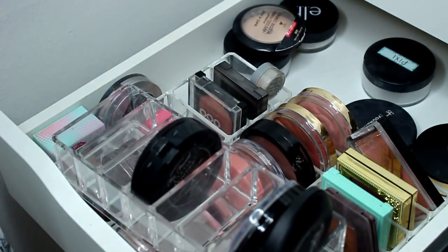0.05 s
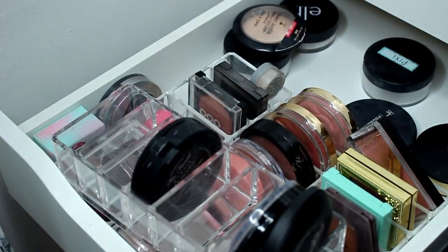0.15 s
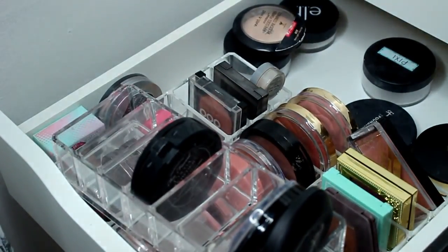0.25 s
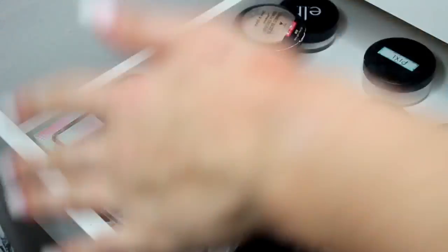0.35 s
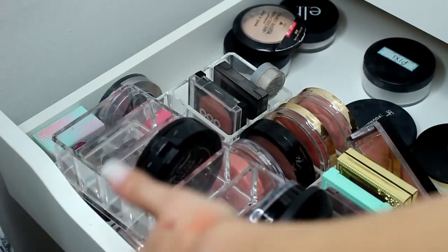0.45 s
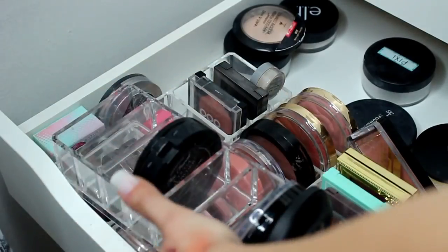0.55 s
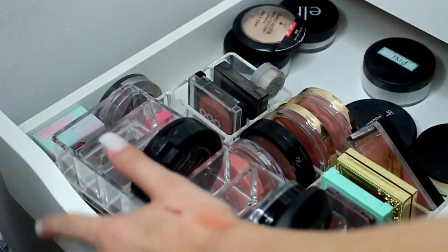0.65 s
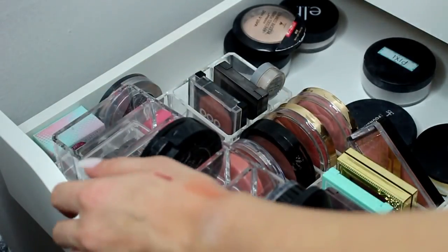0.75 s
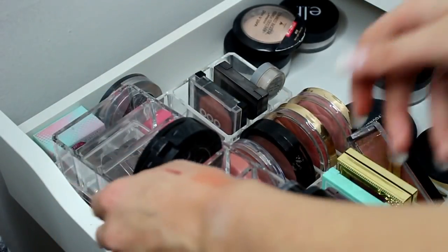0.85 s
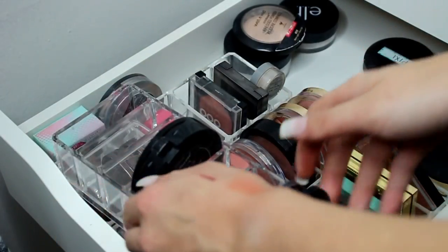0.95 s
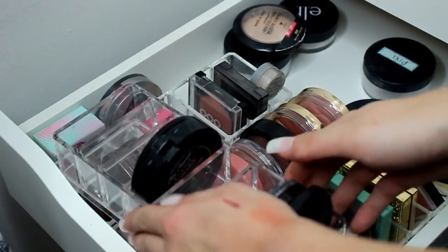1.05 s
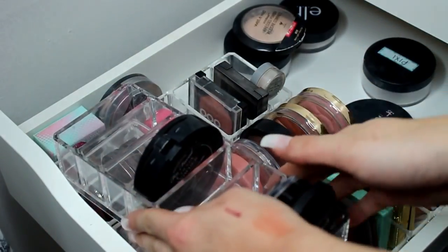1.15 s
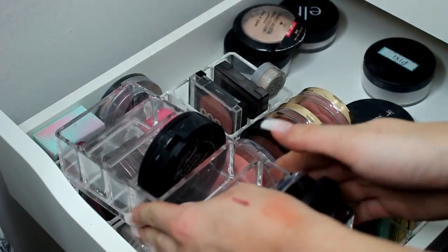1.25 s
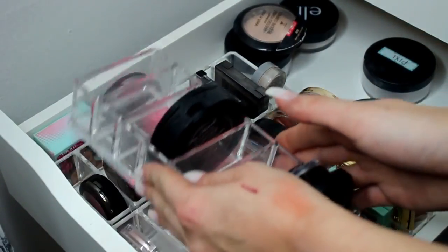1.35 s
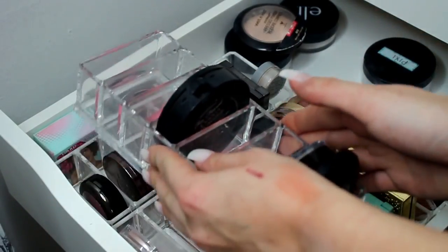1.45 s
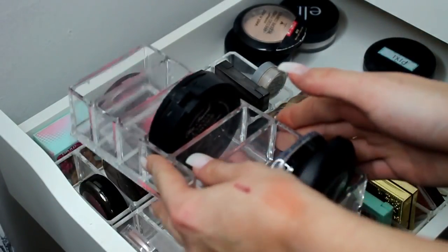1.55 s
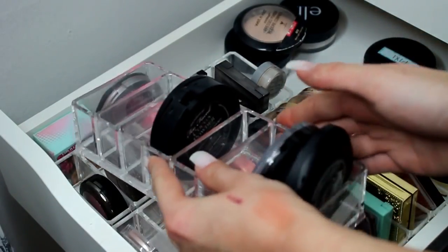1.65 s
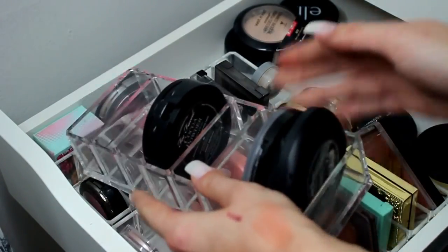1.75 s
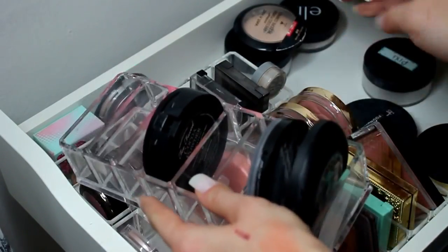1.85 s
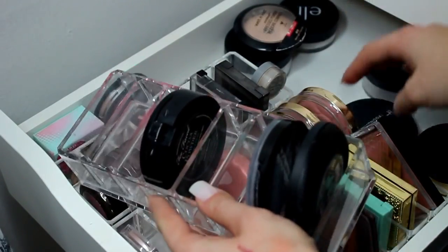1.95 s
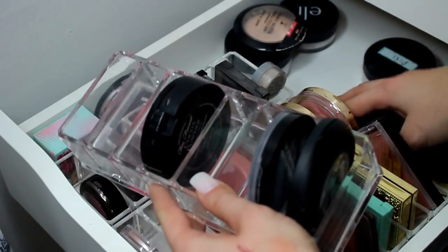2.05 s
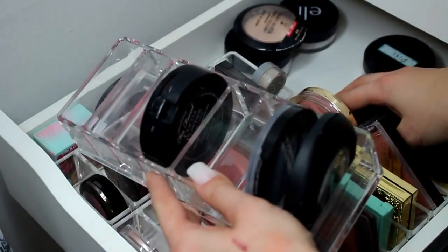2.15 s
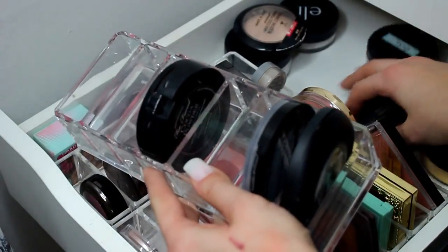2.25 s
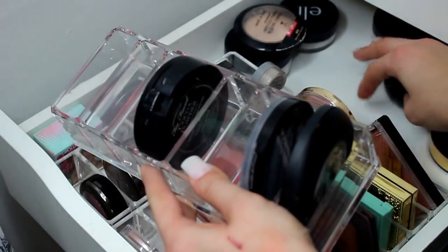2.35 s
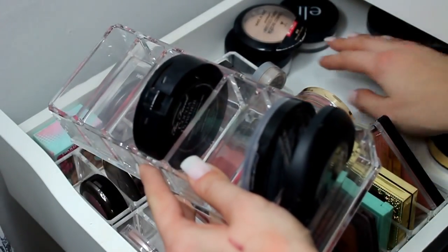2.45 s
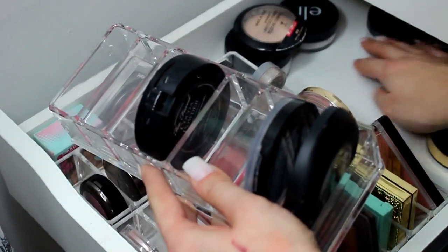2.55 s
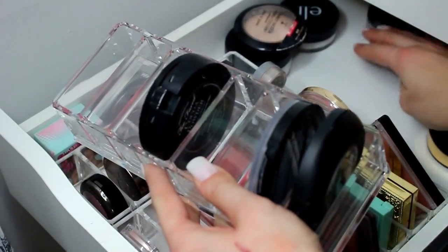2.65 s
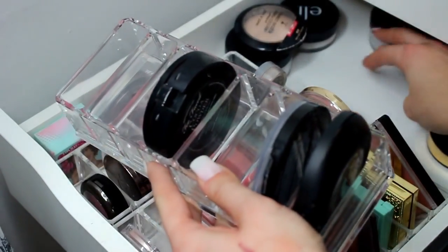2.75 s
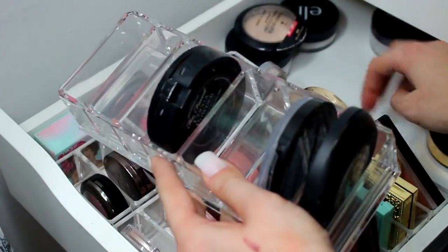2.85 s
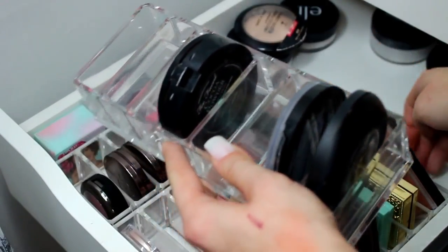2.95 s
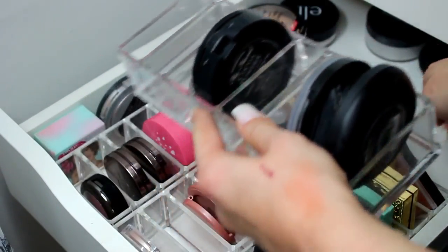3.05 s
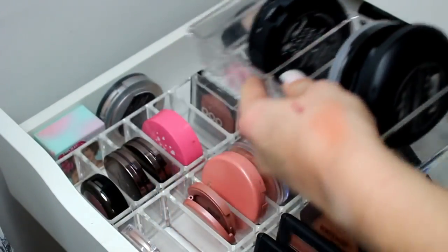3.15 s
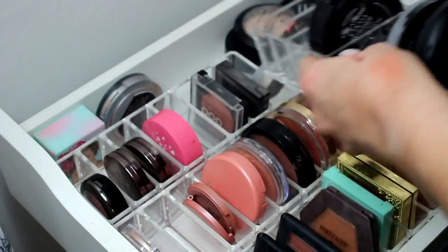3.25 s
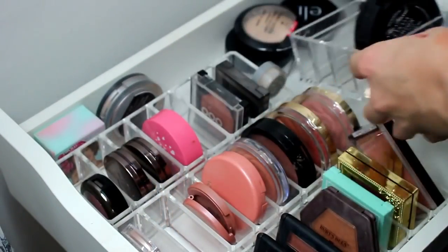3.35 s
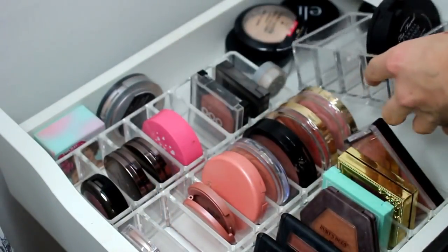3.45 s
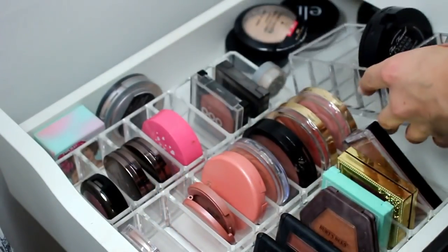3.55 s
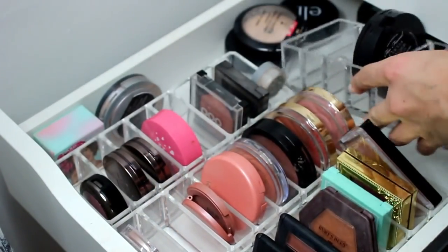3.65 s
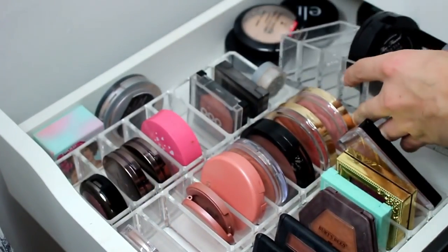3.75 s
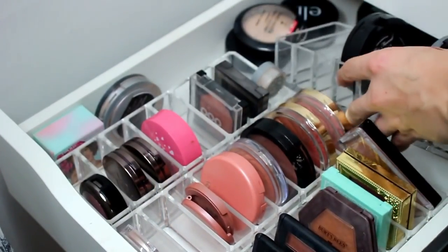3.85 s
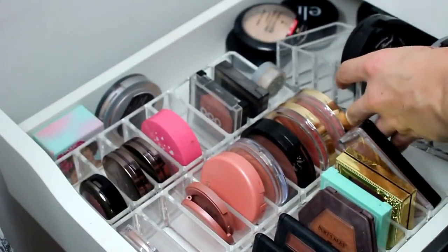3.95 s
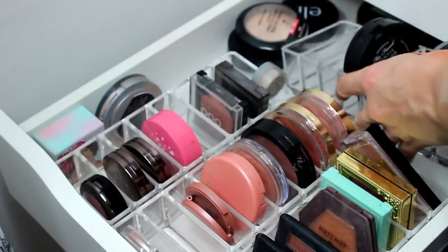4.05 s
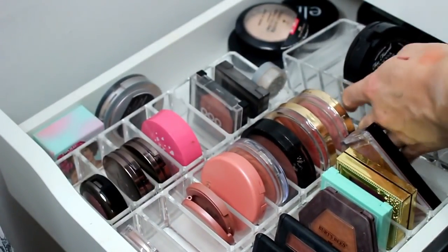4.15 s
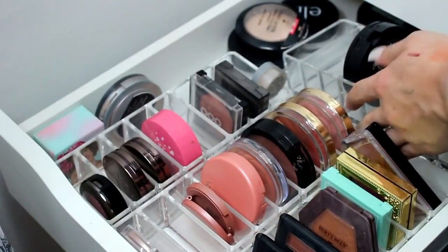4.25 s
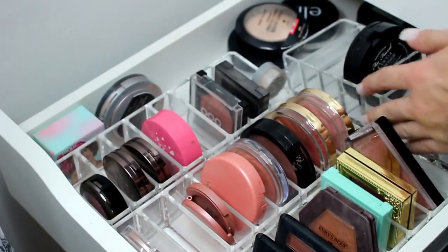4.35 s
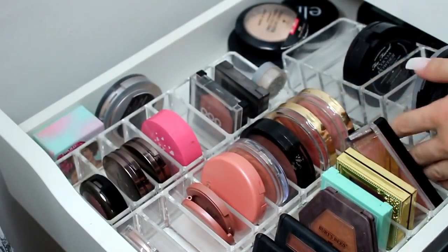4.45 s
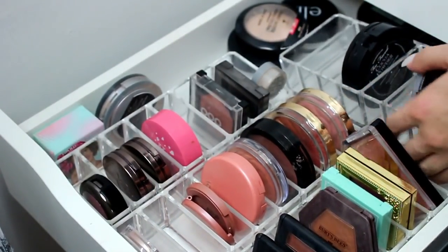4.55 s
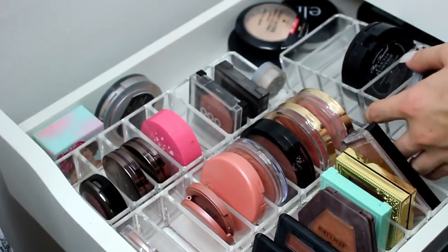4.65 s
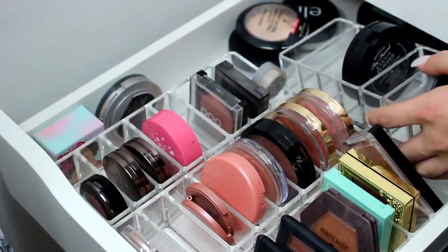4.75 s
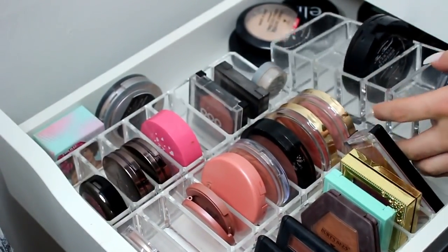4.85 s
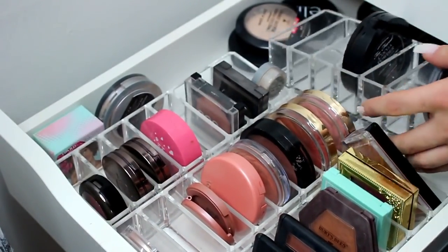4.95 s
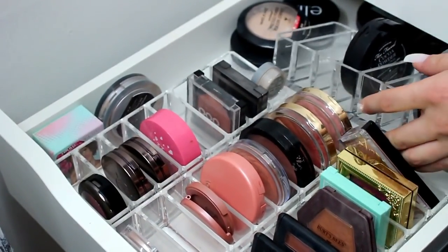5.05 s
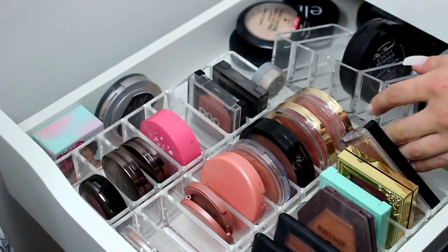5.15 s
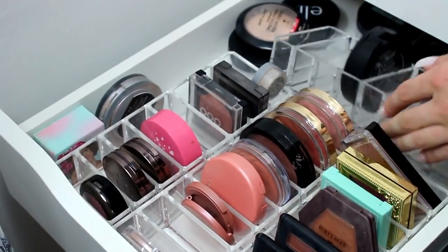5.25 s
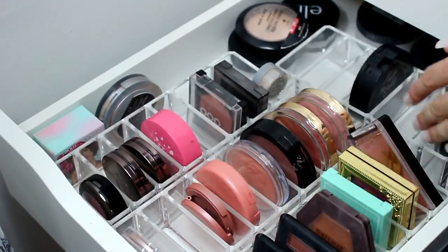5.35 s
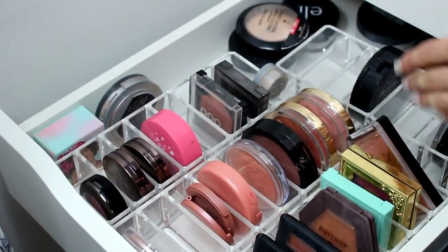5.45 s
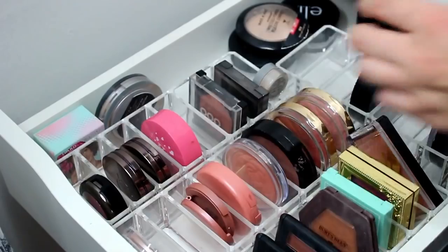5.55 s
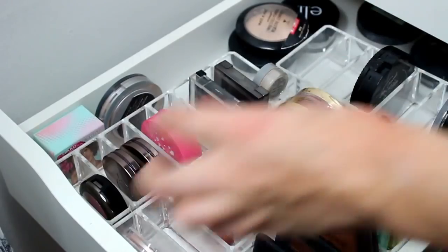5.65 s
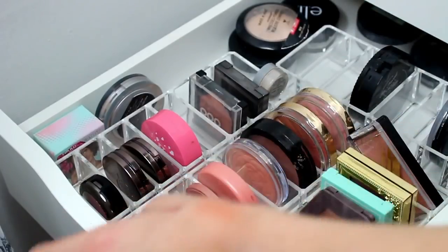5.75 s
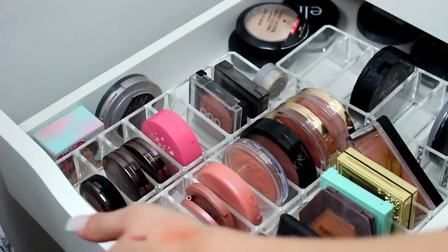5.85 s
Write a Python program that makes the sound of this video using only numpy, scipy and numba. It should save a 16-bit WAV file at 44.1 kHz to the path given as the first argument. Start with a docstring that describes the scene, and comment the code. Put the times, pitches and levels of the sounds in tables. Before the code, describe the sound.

Hands handle hard plastic cases in a drawer. A quiet opening with light ticks gives way to short, bright clacks, hollow drawer knocks and brief gritty drags. The loudest hits come near the middle and slightly distort. Dense rattling continues as the tray is nudged into place, fading to a faint slide at the end. Very close, dry indoor sound with little echo.

```python
"""Plastic tray and pots in a wooden drawer

Hands lift a clear plastic tray of compacts, shove loose pots along a wooden drawer and set the tray down in it.
Cases knock in short rattling contacts: bursts of noise that ring decaying sines of tray and drawer.
Pots drag with stick-slip (jolting noise through the same rings), skin brushes plastic (filtered noise),
a case squeaks (a rough tone) and the cabinet thumps (low sines).
A small quiet room with faint air, and a close microphone that clips the hardest knocks."""
import sys
import numpy as np
from scipy import signal
from scipy.fft import rfft, irfft
from scipy.io import wavfile
from scipy.ndimage import uniform_filter1d
from numba import njit

SR = 44100
rng = np.random.default_rng(int(sys.argv[2]) if len(sys.argv) > 2 else 0)


def wrap_up_sound(samples):
    """Save the sound to the file named by the first command line argument, as 16-bit audio."""
    columns = np.atleast_2d(samples).T
    # keep every value between -1 and 1, then stretch to whole-number steps
    tamed = np.clip(columns, -1, 1)
    steps = np.round(tamed * 32767).astype(np.int16)
    wavfile.write(sys.argv[1], SR, steps)


def volts(x):
    """Linear amplitude factor 10**(x/20) for a level x in dB, scalar or array-like."""
    e = np.asarray(x, float) / 20
    return 10 ** e


N = 259924  # length in samples

# Ways the tray and cases ring. Each row: pitch in Hz before detuning, level in dB, time to fall 60 dB in seconds.
TRAY_MODES = [(770, -3, 0.013), (887, -1.5, 0.015), (1050, -2, 0.013), (1331, -2.5, 0.014),
              (1658, -3.5, 0.011), (1998, -2, 0.011), (2834, -2.5, 0.0045)]
# Ways the drawer panels ring. Each row: pitch in Hz before detuning, level in dB, time to fall 60 dB in seconds.
DRAWER_MODES = [(238, 4, 0.04), (396, 2, 0.002), (409, 10, 0.024), (493, 26, 0.012)]
# Tone colour of the treble crackle. Each row: frequency in Hz, relative level in dB.
CRACK_COLOUR = [(700, -9), (1600, -11.5), (3400, 0.5), (5500, 2.5), (10400, -12), (16000, -25)]
RING_S = .08  # length of every computed ring, seconds


def unit(x):
    """Scale to an rms (average strength) of 1."""
    return x / np.sqrt(np.mean(x ** 2))


def peak(x):
    """Scale each row to a peak of 1."""
    return x / np.abs(x).max(axis=-1, keepdims=True)


def colour(x, points):
    """Filter by a spectrum given as (Hz, dB) points."""
    hz, db = np.transpose(points)
    f = np.fft.rfftfreq(x.shape[-1], 1 / SR) + 1  # the 1 avoids log(0)
    gain = volts(np.interp(np.log(f), np.log(hz), db))
    return irfft(rfft(x) * gain, x.shape[-1])


def rings(modes, detune):
    """One decaying sine per mode, neighbours in opposite sense, with every pitch multiplied by detune."""
    hz, db, t60 = np.array(modes).T[:, :, None]
    t = np.arange(int(RING_S * SR)) / SR
    sense = (-1) ** np.arange(len(modes))[:, None]
    decay = np.exp(-np.log(1000) * t / t60)
    return sense * volts(db) * decay * np.sin(2 * np.pi * hz * detune * t)


def walk(rate):
    """Random levels held for 1 / rate seconds, then smoothed over that time; rms near 1."""
    k = int(SR / rate)
    held = np.repeat(rng.standard_normal(N // k + 1), k)
    return unit(uniform_filter1d(held, k)[:N])


def grit(shape, spread_db):
    """Noise of very unequal grains, like tiny collisions."""
    grain_size = np.minimum(rng.exponential(size=shape), 6.0)
    return rng.standard_normal(shape) * volts(spread_db * grain_size)


@njit
def svf(x, hz, sharp):
    """Band-pass filter with a moving centre: it keeps what lies near hz, more narrowly if sharp is high."""
    y, band, low, damping = np.empty(len(x)), 0., 0., 1 / sharp
    for i in range(len(x)):
        g = np.tan(np.pi * hz[i] / SR)
        v = (band + g * (x[i] - low)) / (1 + g * (g + damping))
        band, low, y[i] = 2 * v - band, low + 2 * g * v, damping * v
    return y


def strokes(table, rise_db_s, fall_db_s):
    """Gain of each row over time: it swells to its level, holds for its length and dies away."""
    start, length, db = np.array(table).T[:3, :, None]
    t = np.arange(N) / SR
    before, after = np.maximum(start - t, 0), np.maximum(t - start - length, 0)
    return volts(db - rise_db_s * before - fall_db_s * after)


def loudest(table, gains):
    """Gain and last column of whichever row is strongest at each sample."""
    return gains.max(axis=0), np.array(table)[gains.argmax(axis=0), -1]


def room_air():
    """Faint room noise: random noise coloured mostly low, sinking in level early on."""
    # Each row: frequency in Hz, relative level in dB.
    air_colour = [(25, -14.5), (242, -8), (317, -19), (354, -5.5), (416, -15), (1950, -23), (16000, -38)]
    # Each row: time in seconds, rms level in dB.
    air_level = [(.9, -43.5), (1.6, -52)]
    s, db = np.transpose(air_level)
    level = np.interp(np.arange(N) / SR, s, db)
    return volts(level) * unit(colour(rng.standard_normal(N), air_colour))


def brush():
    """Skin on plastic: the broad hiss of a finger sliding over a smooth wall."""
    # Each row: start in seconds, length in seconds, level in dB, centre of the hiss in Hz.
    brushes = [(0.0, 0.12, -43, 5300), (.175, 0.05, -30, 5500), (.985, 0.018, -20, 7570),
               (2.24, 0.15, -45.5, 9050)]
    gain, hz = loudest(brushes, strokes(brushes, rise_db_s=709, fall_db_s=486))
    flutter = volts(2 * walk(200))
    hiss = svf(svf(grit(N, spread_db=1), hz, 1.2), hz, 1.2)
    return gain * flutter * unit(hiss)


def contacts():
    """All kinds of knock as rows of time, level, ring, thud, crack and whether a nail strikes."""
    # Cases clack against the tray. Each row: start in seconds, ring peak in dB, strongest ring in Hz,
    # treble crack in dB against the ring.
    clacks = [(1.021, -11, 1040, -14), (1.059, -8, 800, 2), (1.342, -6.5, 1050, -8),
              (1.35, -11.5, 800, 5.5), (1.379, -6.5, 2400, 6), (1.424, -6, 1250, -5.5),
              (1.483, -3.5, 1840, -7), (1.55, -7.5, 1090, -4), (1.572, -12.5, 1050, -6),
              (1.642, 5, 1090, -2.5), (1.775, -3, 764, 0.5), (1.783, -6, 1050, -10), (2.253, -4, 798, 5),
              (3.38, 5, 1500, -10.5), (3.427, -6.5, 806, -2.5), (3.488, -1, 970, 0.5),
              (3.675, -9, 830, -12), (3.688, -4.5, 770, -3.5), (3.725, 4, 820, 1), (3.762, -13, 2640, 4),
              (3.863, -6.5, 900, 1.5), (4.095, -8, 760, -7), (4.358, -8, 1260, 0.5), (4.519, -8, 710, -10),
              (4.543, -3, 1050, 2.5), (4.578, -7.5, 1270, 1.5), (4.613, -5.5, 1300, 2.5),
              (4.759, -8, 930, -23), (4.801, -6, 1070, -3.5), (4.888, -0.5, 1700, 4.5),
              (5.015, -2.5, 824, -2), (5.026, -4, 885, 5.5), (5.039, -4, 1290, -4.5), (5.181, -3, 1220, -5),
              (5.308, -1, 1000, -2), (5.372, -1.5, 576, 5.5), (5.529, -16, 1400, -3),
              (5.663, -25.5, 824, -7.5), (5.775, -32, 910, -5)]
    # Pots and tray bump the drawer. Each row: start in seconds, ring peak in dB,
    # drawer thud in dB against the ring, treble crack in dB against the ring.
    bumps = [(1.763, -12.5, -1, -2), (2.073, -17, 6, 5), (2.33, -8.5, 10.5, 2), (2.397, -5, -0.5, -4),
             (2.595, 1, -10, -5), (2.714, -6.5, -9, -19), (2.789, -9, 9.5, 3), (2.819, -22, 9.5, -26),
             (3.033, -4.5, 5.5, -1), (3.079, -22, 13, 9), (3.161, -3.5, 0, -1.5), (3.843, -7.5, 9, -27),
             (4.012, -13.5, 6, -31), (4.032, -14, 7.5, -30), (4.058, -10, -4.5, -30), (4.134, -2, 0, -11),
             (4.232, -14.5, -7, -36), (4.965, -13, -7, -17), (5.05, -12.5, 4.5, 5),
             (5.296, -3.5, -0.5, 8.5), (5.334, -6.5, 1.5, 5), (5.431, -15, -0.5, 4.5)]
    # Rims tick lightly. Each row: start in seconds, ring peak in dB.
    ticks = [(0.144, -22.5), (0.904, -36), (1.036, -19.5), (1.103, -28.5), (1.131, -31), (1.202, -38),
             (1.259, -21), (1.275, -35), (2.954, -21.5), (3.516, -22.5), (3.566, -27.5), (4.167, -25.5),
             (4.454, -32.5), (4.478, -31.5), (4.525, -24.5), (4.631, -21.5), (4.732, -25), (4.838, -21.5),
             (4.98, -18.5), (5.191, -13), (5.233, -17), (5.569, -26)]
    # Fingernails tick on hard plastic, nearly all treble. Each row: start in seconds, crack peak in dB.
    nails = [(0.169, -12.5), (0.231, -19.5), (0.94, -12.5), (2.113, -30), (2.139, -17), (2.586, -21),
             (2.688, -22), (2.709, -6.5), (2.742, -11.5)]
    clack_thud_db, bump_ring_hz = -17.5, 800
    tick_ring_hz, tick_thud_db, tick_crack_db = 1250, -6, 11
    nail_crack_db = 24  # against the ring
    return ([(s, db, hz, clack_thud_db, crack, False) for s, db, hz, crack in clacks]
            + [(s, db, bump_ring_hz, thud, crack, False) for s, db, thud, crack in bumps]
            + [(s, db, tick_ring_hz, tick_thud_db, tick_crack_db, False) for s, db in ticks]
            + [(s, db - nail_crack_db, tick_ring_hz, tick_thud_db, nail_crack_db, True) for s, db in nails])


def knocks():
    """Each contact is a few ms of chatter; it rings the tray modes near the struck spot's pitch most."""
    s, db, spot_hz, thud_db, crack_db, nail = np.array(contacts()).T[:, :, None]
    t = np.arange(int(RING_S * SR)) / SR
    n_tray = len(TRAY_MODES)
    chance = rng.standard_normal((len(s), 3, n_tray + len(DRAWER_MODES), 1))
    contact_s = .0034 * np.exp(.2 * chance[:, 0, 0])

    # the blow, then two weaker rebounds 6-35 ms later
    delay = (.006 + .029 * rng.random((len(s), 3, 1))) * [[0], [1], [1]]
    lag = np.maximum(t - delay, 0)
    # lighter touches are softer and build up more slowly
    build_up = 1 - np.exp(-lag / (0.00041 * volts(-db[:, None] / 2)))
    push = build_up * np.exp(-lag / contact_s[:, None])
    push = push[:, 0] + 0.07 * (push[:, 1] + push[:, 2])
    chatter = grit((len(s), len(t)), spread_db=4.0) * push

    # every mode is a close pair; loose parts detune them from blow to blow
    pairs = sum(rings(TRAY_MODES + DRAWER_MODES, 1 + .03 * chance[:, k]) for k in (1, 2))
    modes = volts(2.5 * chance[:, 0]) * pairs
    octaves_off = np.abs(np.log2(np.array(TRAY_MODES)[:, 0] / spot_hz))
    near = volts(-8 * np.minimum(octaves_off / .45, 1.7))
    tray = np.sum(near[:, :, None] * modes[:, :n_tray], axis=1)
    drawer = np.sum(modes[:, n_tray:], axis=1)
    ring = signal.fftconvolve(chatter, tray, axes=1)
    thud = signal.fftconvolve(chatter, drawer, axes=1)

    # countless short treble modes: the chatter itself, coloured, with the struck case ringing in it
    tc = t[:len(t) // 3]
    # ten modes per blow, spread over 2.3 octaves above 1500 Hz, falling 60 dB in 0.011 s
    hz = 1500 * 2 ** (2.3 * rng.random((len(s), 10, 1)))
    case_ring = np.exp(-np.log(1000) * tc / .011) * np.sin(2 * np.pi * hz * tc).sum(axis=1)
    case = (tc == 0) + volts(-30) * case_ring  # the first term passes the chatter itself
    crack = signal.fftconvolve(chatter, case, axes=1)[:, :len(t)]
    crack = colour(np.pad(crack, ((0, 0), (0, len(t) - 1))), CRACK_COLOUR)
    # differentiating twice leaves a nail's crack nearly all treble
    nail_crack = np.gradient(np.gradient(crack, axis=1), axis=1)
    crack = np.where(nail, nail_crack, crack)

    hits = volts(db) * (peak(ring) + volts(thud_db) * peak(thud) + volts(crack_db) * peak(crack))
    out = np.zeros(N + hits.shape[1])
    for start, hit in zip((s[:, 0] * SR).astype(int), hits):
        out[start:start + len(hit)] += hit
    return out[:N]


def thumps():
    """Heavy blows and a leaning body shake the whole cabinet into low, heavily damped swings."""
    # Each row: start in seconds, strength of the blow in dB.
    blow_table = [(0.289, -29), (1.642, -31), (2.071, -24), (3.039, -28), (3.378, -17), (5.297, -32)]
    # Each row: pitch in Hz before detuning, level in dB, time to fall 60 dB in seconds.
    cabinet = [(108.5, -0.5, 0.04), (35.2, -8.5, 0.076)]
    s, db = np.array(blow_table).T
    blows = np.zeros(N)
    blows[(s * SR).astype(int)] = volts(db)
    return signal.fftconvolve(blows, rings(cabinet, 0.97).sum(axis=0))[:N]


def drag():
    """Tray and pots slide over many small bumps, which excite drawer, tray and fine treble together."""
    # Each row: start in seconds, length in seconds, tray ring in dB, drawer rumble in dB against the ring.
    slides = [(1.045, 0.017, -32, -6.5), (1.334, 0.056, -30, -1.5), (1.64, 0.14, -36, -4),
              (2.152, .09, -34, 8), (2.257, 0.057, -24.5, 2), (2.389, 0.025, -43.5, 19.5),
              (2.725, 0.033, -34.5, 14.5), (3.036, 0.087, -30.5, 3), (3.447, 0.05, -30, -6),
              (3.74, 0.12, -31, -4), (4.094, 0.036, -35.5, 2.5), (4.49, 0.17, -36.5, -5.5),
              (4.785, 0.046, -39.5, 7.5), (4.995, 0.01, -29.5, 3.5), (5.32, 0.14, -34, -3.5),
              (5.476, 0.043, -36.5, -1.5), (5.68, 0.26, -50, -11)]
    scratch_db = -6.5  # treble against the ring
    gains = strokes(slides, rise_db_s=138, fall_db_s=92)
    rumble_gain = np.max(volts(np.array(slides)[:, 3:]) * gains, axis=0)
    # about 120 bumps a second, each 5 ms wide
    bumps = (rng.random(N) < 120 / SR) * volts(2.2 * rng.standard_normal(N) - 1)
    bumps = np.convolve(bumps, np.hanning(int(.005 * SR)), "same")
    jolts = .8 * volts(2.5 * np.array([walk(30), walk(45), walk(45)])) + bumps
    # the heavy drawer feels the bumps least; rows are drawer, tray, treble
    slips = jolts ** np.array([[.35], [1], [.8]]) * grit((3, N), spread_db=2.0)
    drawer = rings(DRAWER_MODES[1:], 0.94).sum(axis=0)
    # soft sliding contact favours the lower tray modes
    tray = (rings(TRAY_MODES, 0.948) / np.array(TRAY_MODES)[:, :1]).sum(axis=0)
    rumble = unit(signal.fftconvolve(slips[0], drawer)[:N])
    ring = unit(signal.fftconvolve(slips[1], tray)[:N])
    scratch = volts(scratch_db) * unit(colour(slips[2], CRACK_COLOUR))
    return rumble_gain * rumble + gains.max(axis=0) * (ring + scratch)


def squeak():
    """A case squeaks in its slot: uneven quick slips give a rough tone and rattle the slot's walls."""
    # Each row: start in seconds, length in seconds, level in dB, middle pitch in Hz.
    squeaks = [(1.812, 0.016, -20.5, 1408), (1.838, 0.0043, -15, 1124)]
    walls_hz, walls_db = (3350, 4630, 5850), -7.5
    gain, hz = loudest(squeaks, strokes(squeaks, rise_db_s=2488, fall_db_s=1502))
    phase = 2 * np.pi * np.cumsum(hz * (1 + .04 * walk(900))) / SR
    rattle = grit(N, spread_db=-3)
    walls = sum(svf(rattle, np.full(N, 1. * f), 42.0) for f in walls_hz)
    tone = unit(np.sin(phase)) + unit(svf(rattle, hz, 9.0)) + volts(walls_db) * unit(walls)
    return gain * unit(tone * volts(3 * walk(400)))


def room(x):
    """Short diffuse tail of echoes, duller than the direct sound: decaying noise as a filter."""
    t60_s, level_db = .22, -15
    t = np.arange(int(.5 * SR)) / SR
    build_up = np.minimum(t / .007, 1)
    tail = rng.standard_normal(len(t)) * np.exp(-np.log(1000) * t / t60_s) * build_up
    tail = colour(tail, [(400, 1), (16000, -5.5)])
    tail = tail / np.sqrt(np.sum(tail ** 2))
    return volts(level_db) * signal.fftconvolve(x, tail)[:N]


def scene():
    """Handling sounds in the room, with cabinet thumps, over its faint air."""
    near = knocks() + drag() + brush() + squeak()
    # small objects radiate hardly any bass
    near = signal.sosfilt(signal.butter(3, 180., "high", fs=SR, output="sos"), near)
    return (near + room(near) + thumps() + room_air())[None]


def band_limit(x):
    """A steep low-pass at the top of the band."""
    return signal.sosfilt(signal.butter(12, 16310, fs=SR, output="sos"), x)


def record(dry):
    """The hardest knocks clip at full scale; the treble rolls off from 15 kHz."""
    clipped = np.clip(dry, -1, 1)
    mix = signal.sosfilt(signal.butter(6, 15000., fs=SR, output="sos"), clipped)
    return band_limit(mix)


dry = scene()
out = record(dry)
wrap_up_sound(out)
```